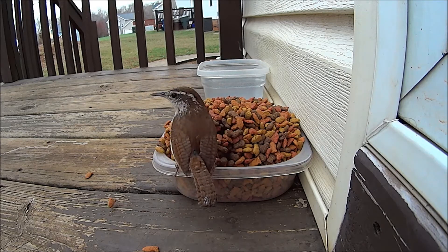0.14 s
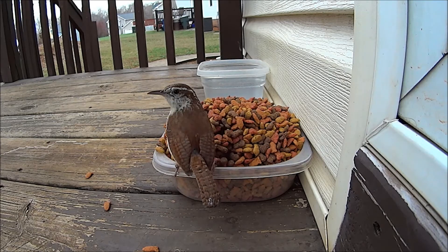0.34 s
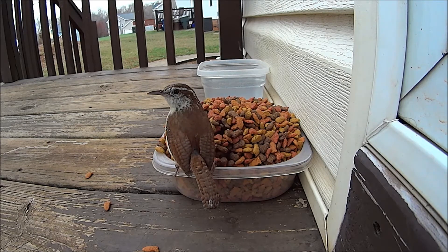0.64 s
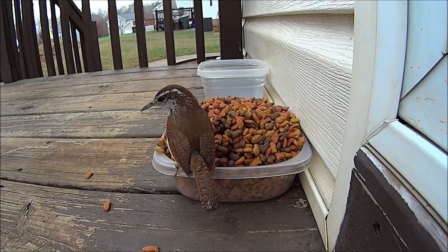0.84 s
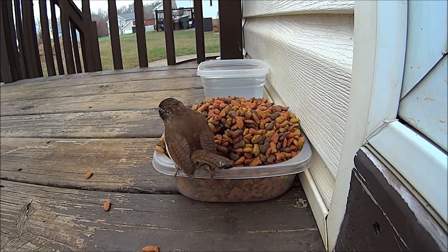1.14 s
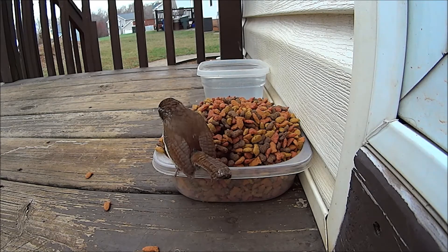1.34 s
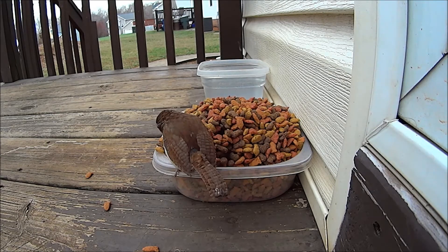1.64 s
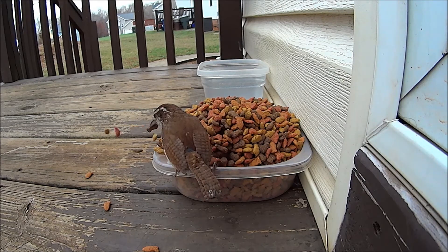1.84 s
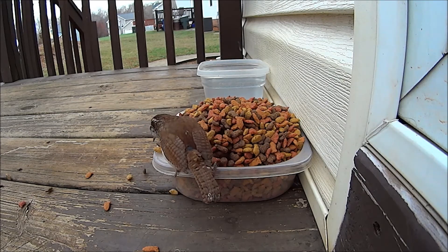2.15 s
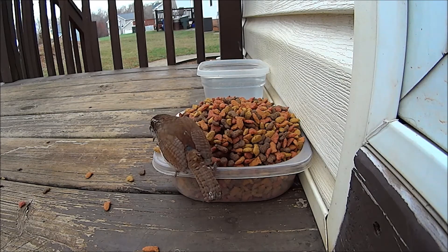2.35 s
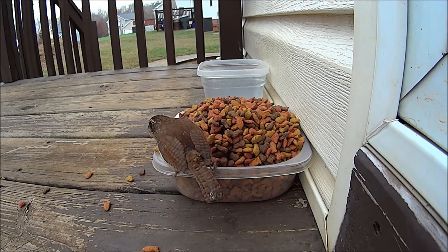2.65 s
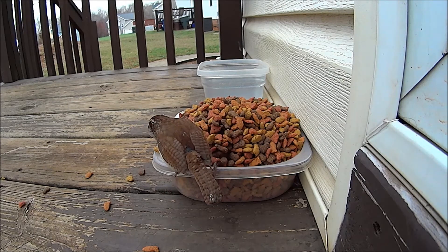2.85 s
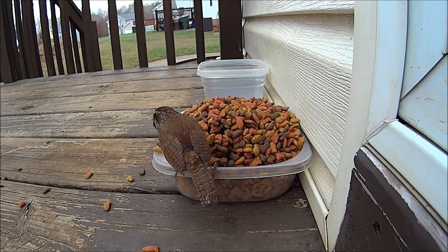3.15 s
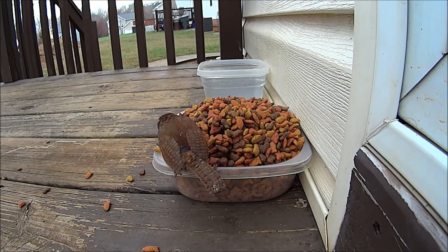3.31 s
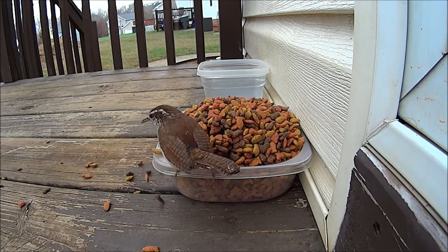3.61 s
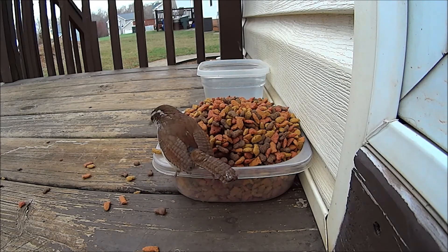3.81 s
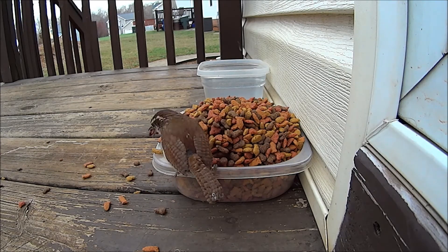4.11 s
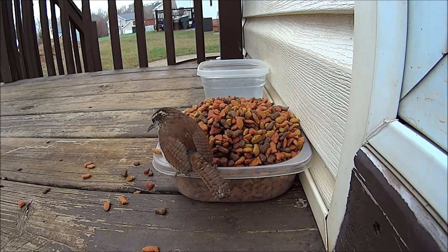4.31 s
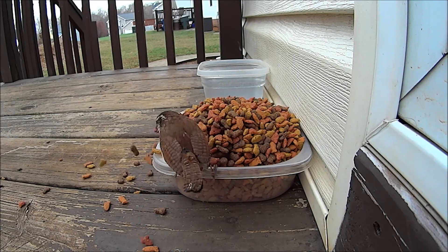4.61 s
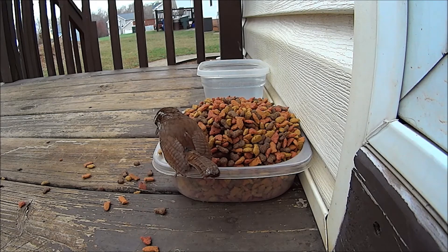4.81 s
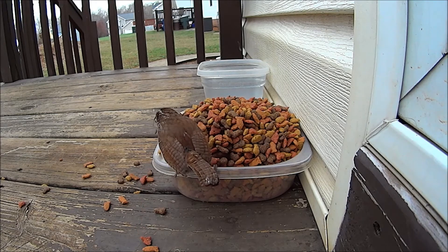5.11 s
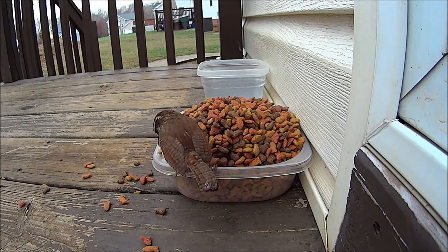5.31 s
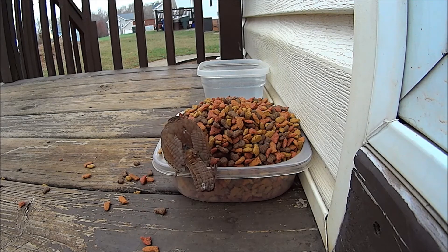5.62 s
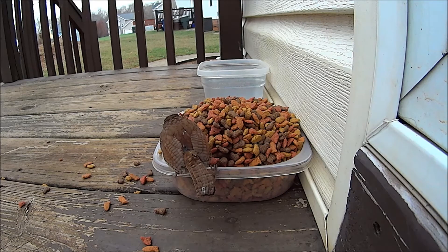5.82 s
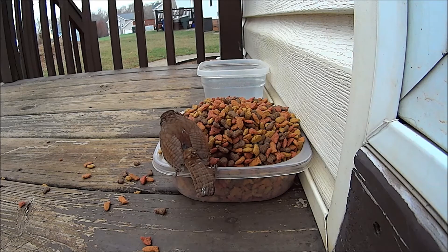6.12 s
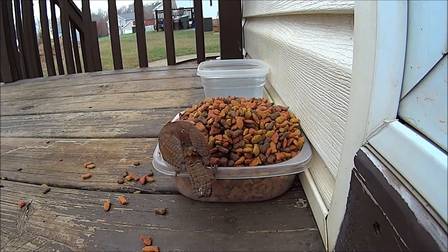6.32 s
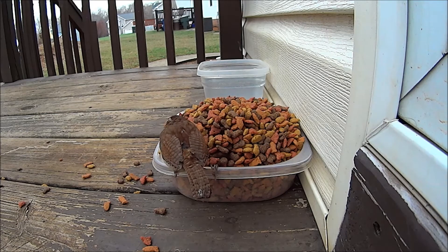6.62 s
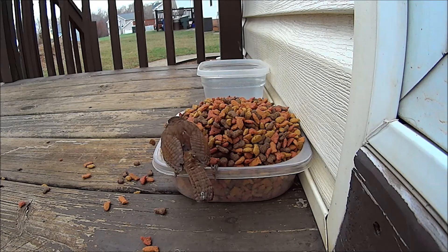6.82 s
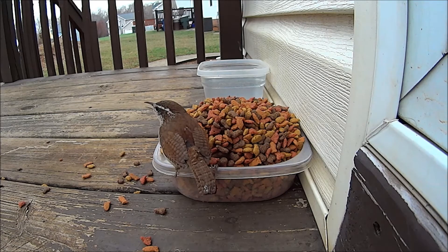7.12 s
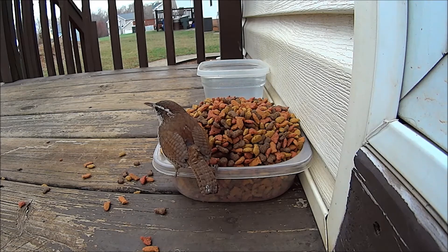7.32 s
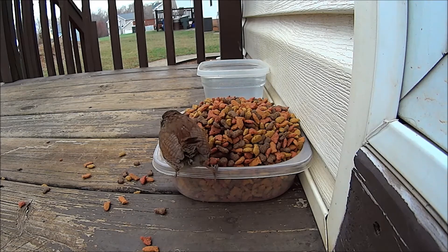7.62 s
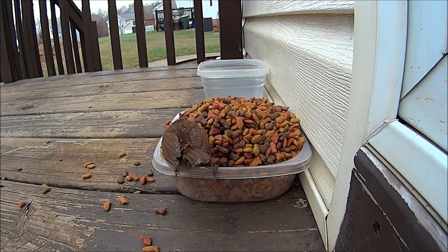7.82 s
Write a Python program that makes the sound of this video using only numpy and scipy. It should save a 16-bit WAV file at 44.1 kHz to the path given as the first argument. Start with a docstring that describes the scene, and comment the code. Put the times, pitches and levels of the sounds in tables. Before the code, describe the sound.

Dry pellets click and knock on plastic and boards; a woodpecker chuckles, then an unseen wren sings five bright, rolling phrases outdoors.

```python
"""A low outdoor rumble, a hiss and a blurred far chorus, all filtered noise or gliding tones, run throughout.
A wren rummages in a plastic tub of dry pet food on a wooden deck: pellets click and knock, as damped modes.
Single farther birds soon call; a woodpecker yelps and chuckles through a throat resonance.
Then another wren, out of sight, sings five ringing phrases of gliding whistles that echo round the yards.
Near the end a far songbird rolls one motif five times, growing louder."""
import sys
import numpy as np
from scipy import signal
from scipy.fft import rfft, irfft, next_fast_len
from scipy.io import wavfile
from scipy.ndimage import map_coordinates

SR = 44100
rng = np.random.default_rng(int(sys.argv[2]) if len(sys.argv) > 2 else 0)


def log_audio(samples):
    """Write samples as a 16-bit WAV file to the path given in sys.argv[1]."""
    # one column per channel
    frames = np.atleast_2d(samples).T
    # limit to full scale, then quantise
    limited = np.clip(frames, -1, 1)
    pcm = np.round(limited * 32767).astype(np.int16)
    wavfile.write(sys.argv[1], SR, pcm)


N = 350595

# Resonances of the plastic tub. Each row: pitch in Hz, relative level in dB, t60 in seconds.
TUB_MODES = [(857, -1, 0.024), (1103, 5, 0.02), (1326, -1, 0.023), (1620, 0.5, 0.034), (1910, -2.5, 0.014)]


def amp(db):
    """Decibels to gain."""
    return 10 ** (np.asarray(db) / 20)


def unit(x):
    """x at rms 1."""
    return x / np.sqrt(np.mean(x ** 2) + 1e-20)


def along(points, hz):
    """A curve of (Hz, value) points, read on a log frequency axis."""
    point_hz, values = np.transpose(points)
    return np.interp(np.log(hz + 1), np.log(point_hz), values)


def add(track, s, x):
    """Mix x into the track from time s on."""
    start = max(round(s * SR), 0)
    part = track[start:start + len(x)]
    part += x[:len(part)]


def wobble(rate, size):
    """A smooth random curve of size samples, with rate knots a second."""
    knots = rng.standard_normal(int(size * rate / SR) + 4)
    return map_coordinates(knots, [np.arange(size) * rate / SR])


def filtered(x, response):
    """x shaped by a response, given as a function of frequency in Hz."""
    size = next_fast_len(N + SR // 2)
    hz = np.fft.rfftfreq(size, 1 / SR)
    return irfft(rfft(x, size) * response(hz), size)[..., :N]


def ports(x, left=None):
    """The two microphone ports hear a sound with different phase and level."""
    # How far the left port leads. Each row: frequency in Hz, lead in radians.
    lead = [(40, 0), (120, .4), (340, 1.5), (950, 2.2), (1700, 1.9), (2500, 1.2), (3100, 1.1), (3700, .6),
            (5300, .25), (7000, 0)]
    # Default balance. Each row: frequency in Hz, left level over right in dB.
    near_left = [(200, 0.5), (1100, 3.5), (2500, 4), (3300, 2.5), (4200, 5), (5500, 4.5), (11000, 0.5)]
    balance = near_left if left is None else left

    def response(hz):
        # each port takes half of the difference
        half = amp(along(balance, hz) / 2) * np.exp(.5j * along(lead, hz))
        return np.array([half, 1 / half])

    return filtered(x, response)


def yard(x, build, apart):
    """Diffuse echoes from houses and trees: they build up, then each frequency dies at its own speed."""
    # Echo decay. Each row: frequency in Hz, t60 in seconds.
    decay = [(300, .3), (1500, 0.73), (3000, 0.44), (5200, 0.61), (10000, 0.18)]
    hz, t, z = signal.stft(rng.standard_normal((2, SR)), SR, nperseg=256)
    t60 = along(decay, hz)[:, None]
    fade = amp(-60 * t / t60) * (1 - np.exp(-t / build))
    mid, side = signal.istft(z * fade, SR, nperseg=256)[1]
    # apart sets how much the two sides differ
    tail = unit(np.array([mid + apart * side, mid - apart * side])) / np.sqrt(len(mid))
    return signal.fftconvolve(x[None], tail, axes=1)[:, :N]


def echo(x, delay, db):
    """One reflection from a wall, delay in seconds."""
    return amp(db) * np.pad(x, (round(delay * SR), 0))[:N]


def motif(notes, s, db):
    """The notes of a motif, begun at time s, as rows (note, s, level dB, pitch ratio)."""
    return [(name, s + offset, db + level, 1) for name, offset, level in notes]


def repeat(notes, s, period, step_db, count):
    """A motif repeated at an even pace, its level changing by a step each time."""
    return [row for k in range(count) for row in motif(notes, s + k * period, k * step_db)]


def sing(notes, second_db, waver, flutter_db, strain=1):
    """Each note is a gliding whistle with an octave, never quite the same twice."""
    # A note glides between two pitches, fast at first (late if the glide time is negative), and may arch.
    # Each row, by note name: attack, hold and release in seconds, start and end pitch in Hz before the
    # pitch ratio, glide time in seconds, height of the arch in Hz before the ratio.
    note_shapes = { "pip": (.006, .015, .009, 2380, 2740, .0055, 0),
                   "scoop": (.011, .009, .006, 4100, 2900, .0048, 0),
                   "sweep": (.004, .015, .009, 2940, 3980, .06, 0),
                   "whistle": (.014, .055, .02, 4100, 5210, .0052, 0),
                   "drop": (.018, .002, .008, 4400, 2650, .0105, 0),
                   "hold": (.008, .024, .068, 2630, 2492, .0095, 0),
                   "flick": (.004, .009, .016, 2950, 1850, .007, 0),
                   "trail": (.005, .03, .035, 1850, 1420, .04, 0),
                   "yelp": (.012, .032, .012, 950, 1080, .003, 110),
                   "chuckle": (.007, .034, .01, 950, 1250, .03, 700),
                   "rise": (.008, .024, .022, 2300, 3750, .05, 0),
                   "tick": (.01, .018, .02, 2520, 2440, .02, 0),
                   "link": (.006, .012, .015, 3200, 2550, .03, 0),
                   "slur": (.015, .045, .03, 3100, 3480, .02, 100),
                   "dip": (.005, .007, .025, 7000, 6100, .004, 0),
                   "thin": (.015, .058, .014, 6900, 5750, -.025, 100),
                   "coo": (.02, .05, .022, 1400, 1440, .05, 250),
                   "pipe": (.04, .17, .06, 3020, 3000, .05, 0)}
    fade_db = 24  # how far a note rises in its attack and falls in its release
    track = np.zeros(N)
    for name, s, db, ratio in notes:
        attack, hold, release, start_hz, end_hz, glide_s, arch_hz = note_shapes[name]
        length = attack + hold + release
        t = np.arange(int(length * SR)) / SR

        progress = np.expm1(-t / glide_s) / np.expm1(-length / glide_s)
        arch = arch_hz * np.sin(np.pi * t / length)
        glide = start_hz + (end_hz - start_hz) * progress + arch

        edges = signal.windows.tukey(len(t), .005 / length)
        corners = [0, attack, attack + hold, length]
        envelope = edges * amp(np.interp(t, corners, [-fade_db, 0, 0, -fade_db]))

        # strain makes the voice shake more at the top of its range
        unsteady = np.interp(glide, [4000, 5000], [1, strain])
        hz = ratio * glide * (1 + waver * unsteady * wobble(193.4, len(t)))
        phase = 2 * np.pi * np.cumsum(hz) / SR
        loudness = envelope * amp(db + flutter_db * unsteady * wobble(118.7, len(t)))
        add(track, s, loudness * (np.sin(phase) + amp(second_db) * np.sin(2 * phase)))
    return track


def ring(modes, t, scatter_db):
    """Damped modes struck at new strengths, with the energy of 10 ms at rms 1."""
    x = np.zeros(len(t))
    for hz, db, t60 in modes:
        strength = amp(db + rng.normal(0, scatter_db) - 60 * t / t60) * rng.choice([-1, 1])
        x += strength * np.sin(2 * np.pi * hz * t)
    return x / np.sqrt(np.sum(x ** 2) / (SR / 100))


def pellet(low_hz, high_hz, t60, t, count=7):
    """Every pellet has its own few, heavily damped resonances."""
    # one random pitch in each equal slice of the range
    pitches = low_hz + (high_hz - low_hz) * (np.arange(count) + rng.random(count)) / count
    return ring([(hz, 0, t60) for hz in pitches], t, scatter_db=4.5)


def rush(spectrum, left_db):
    """Steady stereo noise, partly alike at the two ports, whose mono mix has rms 1."""
    # Likeness of the two sides. Each row: frequency in Hz, correlation from 0 to 1.
    alike = [(60, 1), (130, 0.83), (270, 0.95), (600, 0.64), (1200, 0.89), (2600, 0.62), (5500, 0.19),
             (11000, 0.51)]

    def response(hz):
        turn = np.arccos(np.clip(along(alike, hz), 0, 1)) / 2
        return amp(along(spectrum, hz)) * np.array([np.cos(turn), np.sin(turn)])

    mid, side = filtered(rng.standard_normal((2, N)), response)
    pair = ports(np.array([mid + side, mid - side]), [(100, 0.0041), (2500, left_db), (11000, 0)])
    return pair / np.std(pair.mean(axis=0))


def outdoors():
    """Far traffic rumbles, swelling gently as shaped noise, under a faint, even hiss."""
    # Noise colours. Each row: frequency in Hz, relative level in dB.
    rumble_colour = [(13, -41), (22, -20), (57, -5.5), (90, -2.5), (196, -11.5), (272, -11.5), (313, -13),
                     (344, -11), (427, -16), (462, -11.5), (556, -16.5), (601, -13), (630, -21.5),
                     (900, -35), (1170, -39), (1980, -120)]
    hiss_colour = [(440, -22), (750, -2.5), (898, -0.5), (1380, -3.5), (1950, -5.5), (2180, -5), (2410, -4),
                   (3580, -6), (3870, -7.5), (4840, -12), (11000, -18.5), (14300, -129), (22000, -120)]
    # Slow swell of the rumble. Each row: time in seconds, level in dB.
    traffic = [(0, -42.7), (3, -42), (3.8, -41), (5.7, -40.4), (6.2, -42), (7.95, -40.6)]
    t = np.arange(N) / SR
    swell_db = np.interp(t, *np.transpose(traffic)) + 0.4 * wobble(6.5, N)
    rumble = amp(swell_db) * rush(rumble_colour, left_db=2.5)
    hiss = amp(-55.8) * rush(hiss_colour, left_db=4)
    return rumble + hiss


def chorus(count=110):
    """Very distant birds warble at random and blur into the yard's echo."""
    # columns: start in seconds, level in dB, pitch ratio
    draws = rng.uniform([0, -60, .72], [N / SR, -53, 1.03], (count, 3))
    notes = [("slur", *row) for row in draws[::2]] + [("rise", *row) for row in draws[1::2]]
    calls = sing(notes, second_db=-29, waver=0.021, flutter_db=3.5)
    return ports(amp(-11) * calls + amp(-7.5) * yard(calls, build=0.013, apart=0.99))


def neighbours():
    """Farther songbirds whistle single notes and one rolling motif, with diffuse echo behind them."""
    # Single notes. Each row: note name, start in seconds, level in dB, pitch ratio.
    single_notes = [("coo", .485, -53, .96), ("coo", 1.255, -53.5, .96), ("thin", 1.385, -61, 1),
                    ("thin", 2.365, -60, 1.02), ("thin", 5.4, -58, 1), ("thin", 5.882, -53, .97),
                    ("dip", 2.3, -59, 1.04), ("dip", 2.475, -55, .82), ("dip", 5.35, -55, 1.02),
                    ("dip", 5.83, -53, 1), ("slur", 2.255, -58, 1.02), ("slur", 2.45, -55, 1.01),
                    ("slur", 6.01, -54, 1.11), ("slur", 6.15, -58, 1.12), ("slur", .94, -60, .9),
                    ("slur", 1.26, -59, .97), ("slur", 6.41, -58, 1.02), ("slur", 6.64, -58, 1),
                    ("pipe", 2.51, -58, 1.01), ("pipe", 3.08, -59, 1.18), ("pipe", 3.88, -48, 1.01),
                    ("pipe", 7.86, -49, 1.01)]
    # The rolling motif. Each row: note name, start in seconds into the motif, level in dB.
    roll = [("rise", 0, -54), ("link", .075, -60), ("tick", .112, -56)]
    rolling = repeat(roll, s=7.154, period=.177, step_db=1.5, count=5)
    calls = sing(single_notes + rolling, second_db=-26, waver=0.008, flutter_db=3)
    return ports(amp(1) * calls + amp(-5) * yard(calls, build=0.0051, apart=0.84))


def woodpecker():
    """A rasping yelp, then an even chuckle; the throat favours partials between about 1.2 and 2.4 kHz."""
    # The throat's resonance. Each row: frequency in Hz, gain in dB.
    throat = [(800, -18), (1200, -1), (1700, 0.5), (2400, -1.5), (2900, -4), (3400, -11.5), (5000, -36)]
    yelp = [("yelp", 2.743, -39, 1)]
    chuckles = repeat([("chuckle", 0, -35.7)], s=2.786, period=.0415, step_db=-.7, count=5)
    voice = sing(yelp + chuckles, second_db=-1, waver=.016, flutter_db=2.5)
    call = filtered(voice, lambda hz: amp(along(throat, hz)))
    # a nearby house repeats the call just behind it
    call += echo(call, delay=.064, db=-6)
    return ports(call + amp(-7.5) * yard(call, build=0.0082, apart=.5))


def singing_wren():
    """The loud whistled song, answered by the house wall, the yard and two houses farther off."""
    # The two halves of a phrase. Each row: note name, start in seconds into the half, level in dB.
    climb = [("pip", 0, -17.7), ("scoop", .039, -14.3), ("sweep", .064, -13.2)]
    descent = [("drop", 0, -11.5), ("hold", .042, -16.3), ("flick", .142, -25.5), ("trail", .16, -38)]
    # Five phrases, their halves ever louder. Each row: climb start in seconds, climb gain in dB,
    # top note level in dB and pitch ratio, descent start in seconds, descent gain in dB.
    phrases = [(3.602, -10.5, -37, .986, 3.797, -7), (4.076, -3, -30, .988, 4.277, -4.3),
               (4.551, -.5, -27, .988, 4.744, -.5), (5.022, 0, -28, 1, 5.224, 0),
               (5.498, 1, -31.5, .972, 5.703, 1.7)]
    whistle_s = .114  # the top note comes this long after the climb begins
    notes = []
    for climb_s, climb_db, top_db, top_ratio, descent_s, descent_db in phrases:
        notes += motif(climb, climb_s, climb_db) + motif(descent, descent_s, descent_db)
        notes.append(("whistle", climb_s + whistle_s, top_db, top_ratio))
    song = sing(notes, second_db=-56, waver=.0011, flutter_db=.5, strain=8)
    near = song + echo(song, delay=.0104, db=-16)
    houses = echo(song, delay=.205, db=-30) + echo(song, delay=.48, db=-40)
    # air takes the treble out of the long paths
    far = filtered(houses, lambda hz: 1 / (1 + (hz / 3300) ** 6))
    scattered = yard(song + far, build=0.0034, apart=0.9)
    return ports(near + far + amp(-9.0) * scattered)


def contacts():
    """Pecks barely reach the boards; falls knock all: rows (s, board, tub, clack, click dB)."""
    # The bill snaps at a pellet. Each row: start in seconds, click, clack and tub knock level in dB,
    # the knock before its share is set below.
    pecks = [(.0228, -23.5, -33, -30.5), (.2714, -49, -49, -56), (1.7837, -43, -51, -60),
             (1.887, -28, -27, -40), (1.92, -39, -43, -42), (1.9295, -41, -41, -47), (1.95, -36, -39, -52),
             (2.1412, -50, -38, -47), (2.1613, -32, -32, -52), (3.373, -38, -25, -45),
             (3.3829, -26.5, -34, -44), (3.4539, -25.5, -31, -42), (3.4866, -35, -36, -47),
             (4.0785, -35, -48, -44), (4.189, -24.5, -46, -43.5), (4.2091, -30, -47, -49),
             (4.219, -27, -34.5, -37), (6.3596, -50, -56, -53), (6.5298, -52, -46, -48),
             (6.609, -47, -63, -66), (6.7045, -46.5, -42, -52), (6.8159, -29, -33, -49),
             (7.868, -50, -50, -62)]
    # A pellet lands on the deck. Each row: start in seconds, overall knock level in dB before its
    # shares are set below, click level in dB.
    falls = [(.0932, -29.5, -29), (.179, -38, -36), (1.9606, -35, -37), (1.9638, -35, -41),
             (1.985, -39, -44), (2.054, -30, -53), (2.0737, -35, -38), (2.0919, -45, -62),
             (2.1269, -42, -56), (2.1672, -41, -52), (3.51, -37, -41), (3.5227, -31, -37),
             (3.5516, -34, -39), (3.5764, -32, -28.5), (3.6351, -36, -49), (3.6862, -31, -31.5),
             (3.7712, -37, -46.5), (4.2761, -29, -60), (4.3856, -35, -35), (4.3945, -40, -39),
             (4.4478, -40, -47), (4.7007, -30, -32), (4.7053, -27, -34), (4.8427, -33, -59),
             (6.9173, -37, -46)]
    rows = []
    for s, click_db, clack_db, tub_db in pecks:
        rows.append((s, tub_db - 10.5, tub_db + 5, clack_db, click_db))
    for s, knock_db, click_db in falls:
        rows.append((s, knock_db + 1.8, knock_db + 1.3, knock_db - 1.7, click_db))
    return rows


def stirring(t):
    """The bill stirs the pellets: each stir is a random shower of tiny pellet and tub contacts."""
    # Each row: start in seconds, length in seconds, level of the strongest contacts in dB.
    stirs = [(1.77, .025, -46.5), (1.803, .032, -44), (1.953, .04, -35.5), (2.046, .045, -47),
             (2.124, .12, -51), (3.303, .039, -44), (3.363, .037, -38.5), (3.404, .068, -52),
             (3.509, .09, -41.5), (3.6, .12, -53), (4.368, .045, -44), (4.514, .06, -45.5),
             (4.701, .045, -40), (4.746, .06, -51), (5.017, .025, -48), (5.5, .023, -52),
             (6.526, .019, -48)]
    track = np.zeros(N)
    for s, length, db in stirs:
        # 400 contacts a second
        for when, weakness in rng.random((int(length * 400), 2)):
            grain = pellet(low_hz=900, high_hz=9450, t60=0.0043, t=t)
            grain += amp(-1.5) * ring(TUB_MODES, t, scatter_db=5)
            add(track, s + when * length, amp(db - 9.7 * weakness) * grain)
    return track


def feeding_wren():
    """Pellets click against the bill and each other, and knock on the tub and the boards, as damped modes."""
    # Resonances of the deck boards. Each row: pitch in Hz, relative level in dB, t60 in seconds.
    boards = [(234.7, -6.5, 0.45), (288, -3.5, 0.13), (350, -8.5, 0.14), (435, -3.5, 0.04),
              (544.3, 5.5, 0.093), (597, -8, 0.026), (1103, -19, 0.2)]
    # Colour of close clicks. Each row: frequency in Hz, gain in dB.
    presence = [(700, 0), (4000, 1), (6000, -1.5), (7400, 2.5), (8800, -4.5), (10000, 3.5), (11200, 5.5)]
    t = np.arange(SR // 4) / SR
    short = t[:SR // 50]
    track, side = stirring(short), np.zeros(N)
    for s, board_db, tub_db, clack_db, click_db in contacts():
        board_knock = amp(board_db) * ring(boards, t, scatter_db=1.5)
        tub_knock = amp(tub_db) * ring(TUB_MODES, t, scatter_db=5)
        clack = amp(clack_db) * pellet(low_hz=2190, high_hz=5810, t60=0.011, t=short)
        click = amp(click_db) * pellet(low_hz=5300, high_hz=9600, t60=.004, t=short)
        add(track, s, board_knock + tub_knock)
        add(track, s, clack + click)
        # the pellet grazes just before the strike and chatters just after it
        graze, chatter = rng.uniform([-.004, .0004], [-.0005, .002])
        for offset, db in [(graze, -19), (chatter, -9)]:
            touch = pellet(low_hz=2500, high_hz=9140, t60=0.0034, t=short)
            add(track, s + offset, amp(max(clack_db, click_db) + db) * touch)
        # so close by, each click reaches the two ports with a different colour
        difference = pellet(low_hz=4800, high_hz=10900, t60=0.006, t=short)
        add(side, s, amp(click_db - 11.5) * difference)
    walls = echo(track, delay=0.0052, db=-17) + echo(track, delay=.015, db=-24)
    scattered = amp(-20) * yard(track, build=.003, apart=0.99)
    pair = np.array([track + side, track - side]) + walls + scattered
    return ports(filtered(pair, lambda hz: amp(along(presence, hz))))


def scene():
    """Everything heard from beside the tub."""
    background = outdoors() + chorus() + neighbours()
    return background + woodpecker() + singing_wren() + feeding_wren()


def record(dry):
    """The sound is dull: little is heard above 11.3 kHz, and almost nothing above 16 kHz."""
    def response(hz):
        band = 1 / np.sqrt(1 + (hz / 11300) ** 110)
        faint_treble = amp(-30) * (hz < 16000)
        return band + faint_treble

    return filtered(dry, response)


dry = scene()
out = record(dry)
log_audio(out)
```